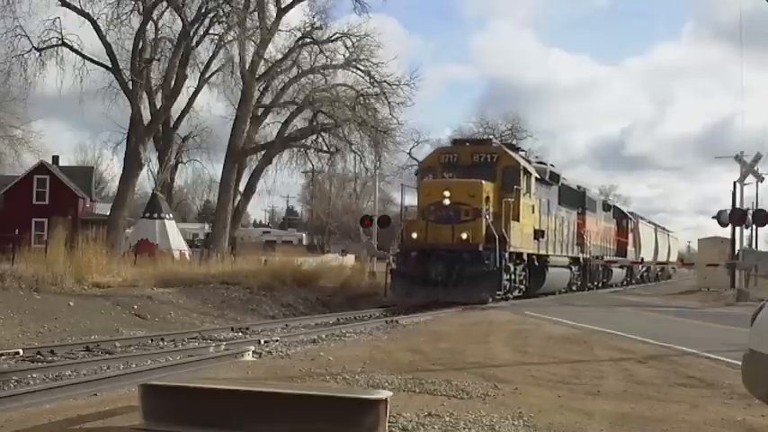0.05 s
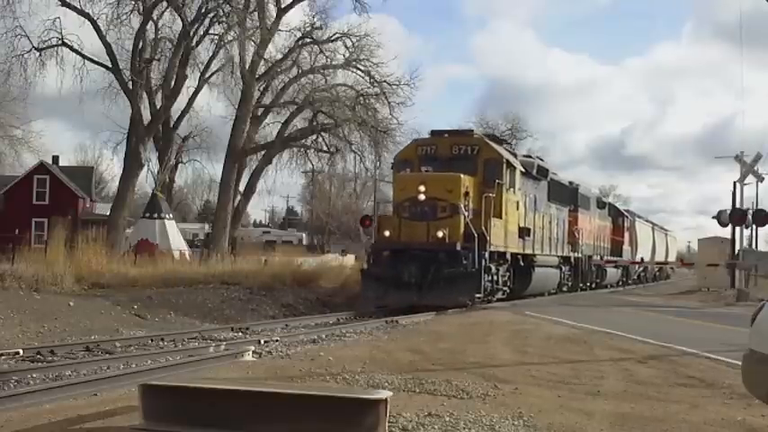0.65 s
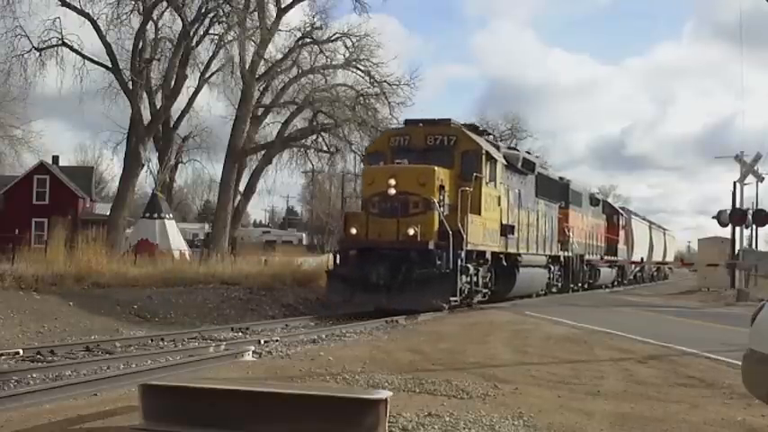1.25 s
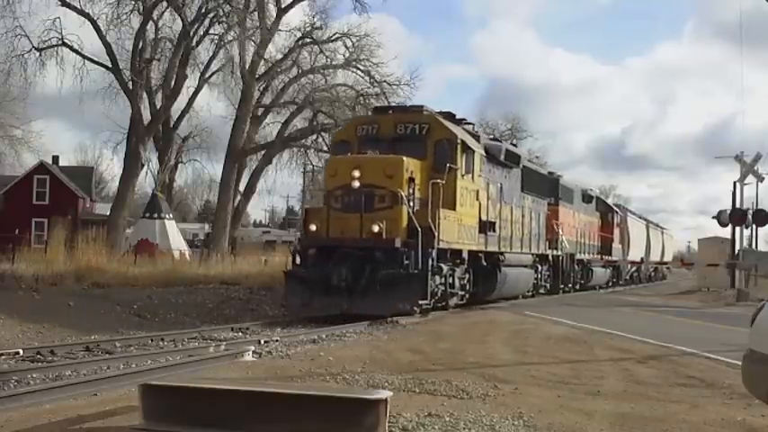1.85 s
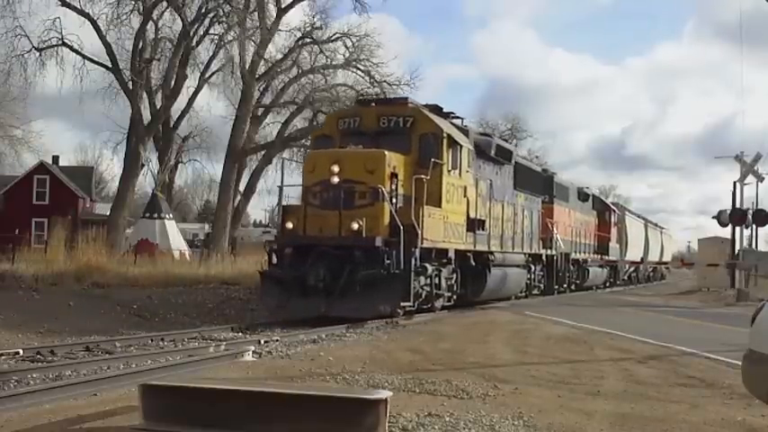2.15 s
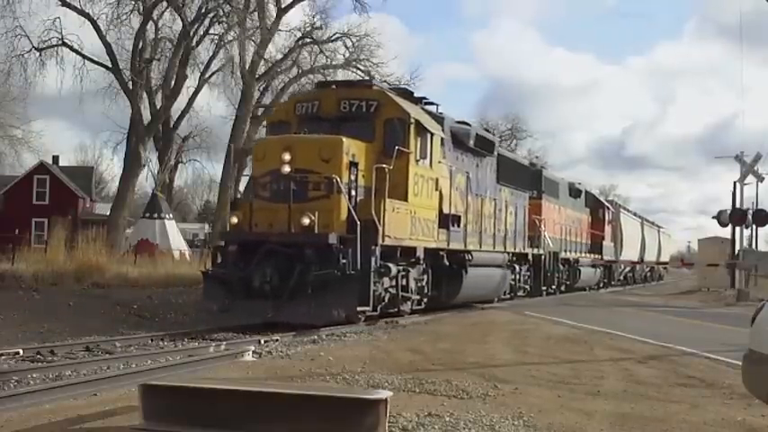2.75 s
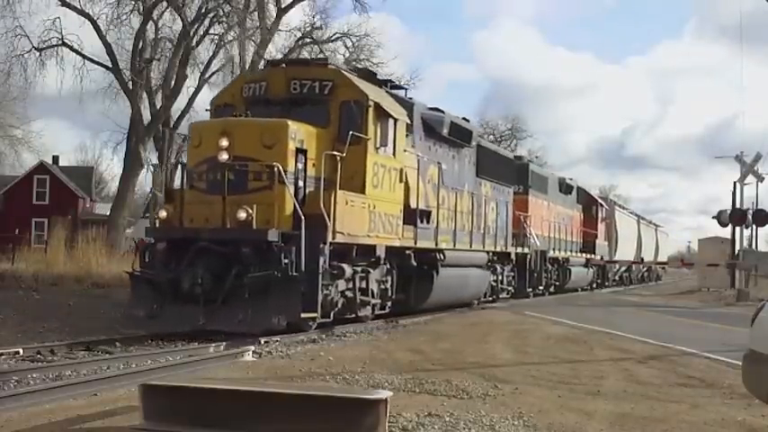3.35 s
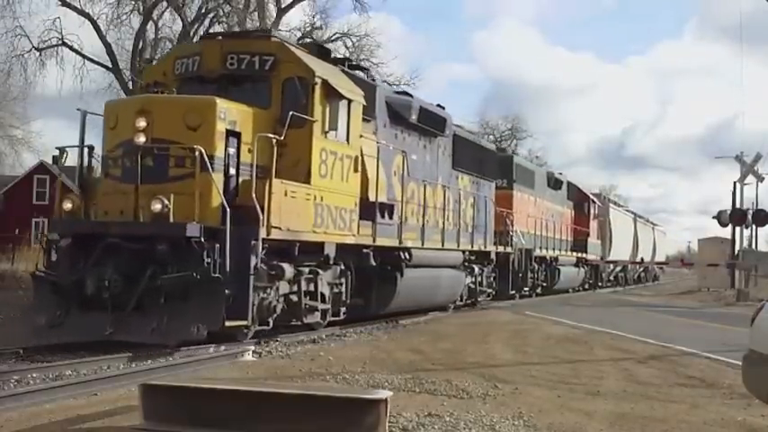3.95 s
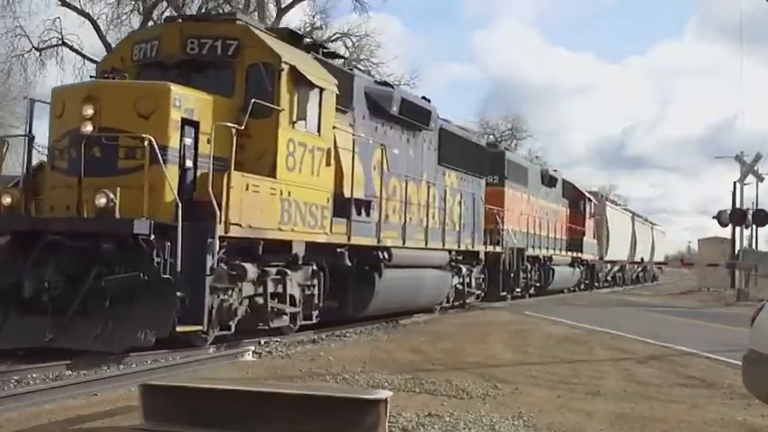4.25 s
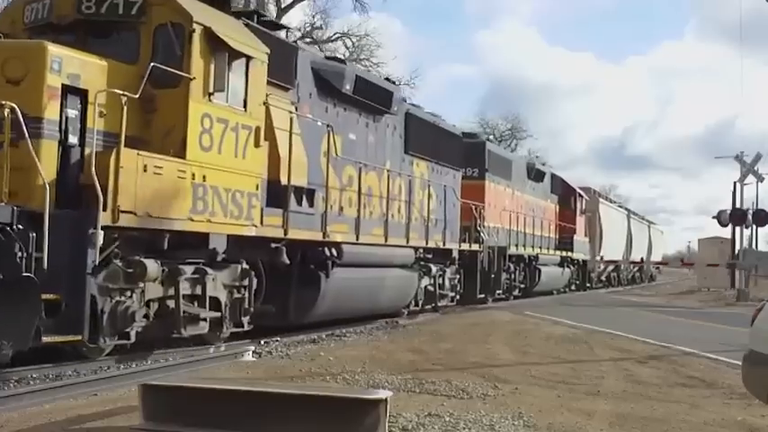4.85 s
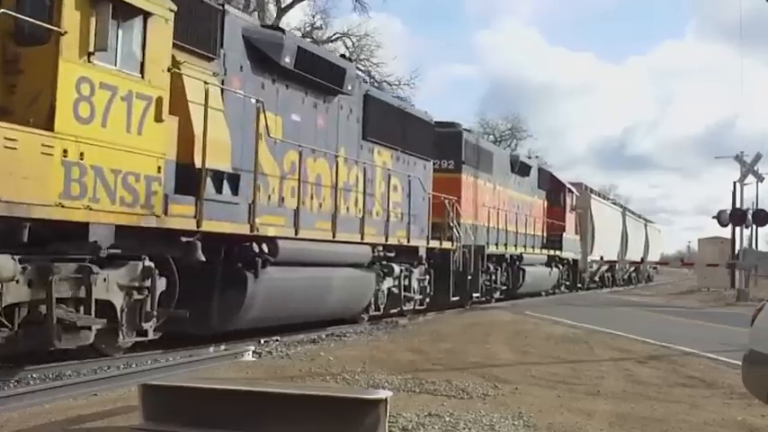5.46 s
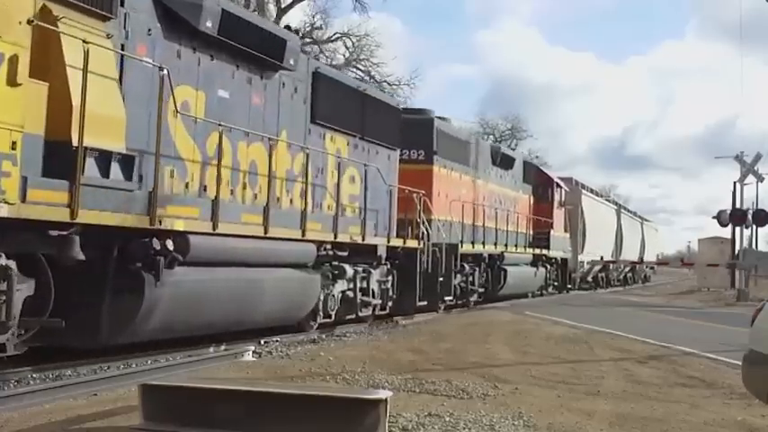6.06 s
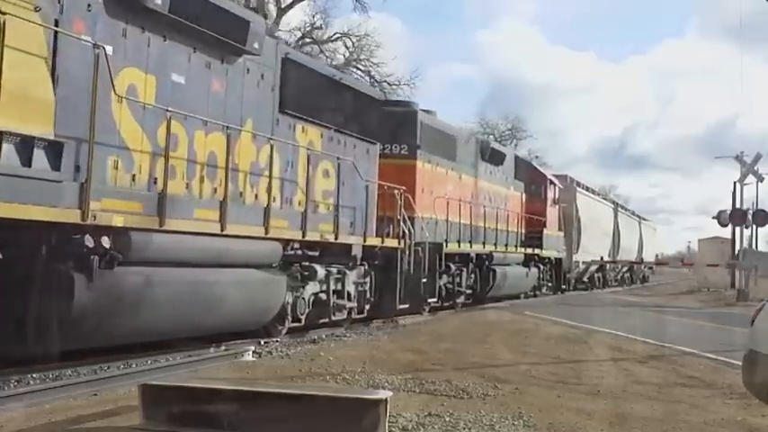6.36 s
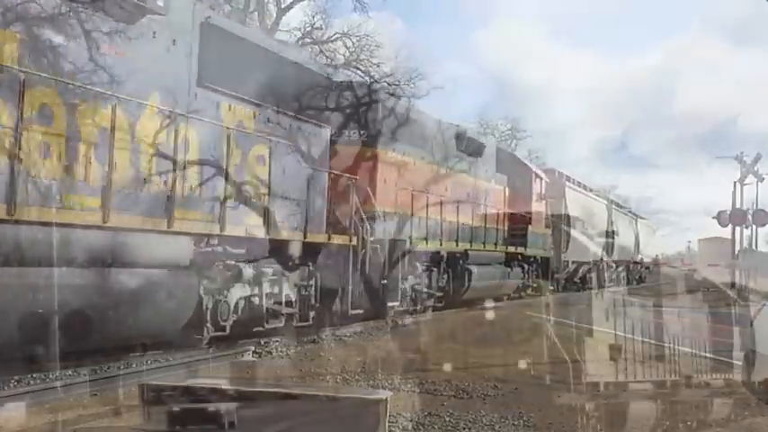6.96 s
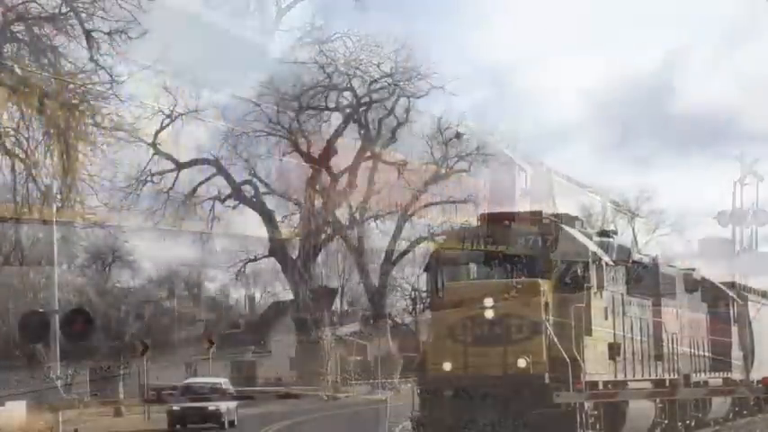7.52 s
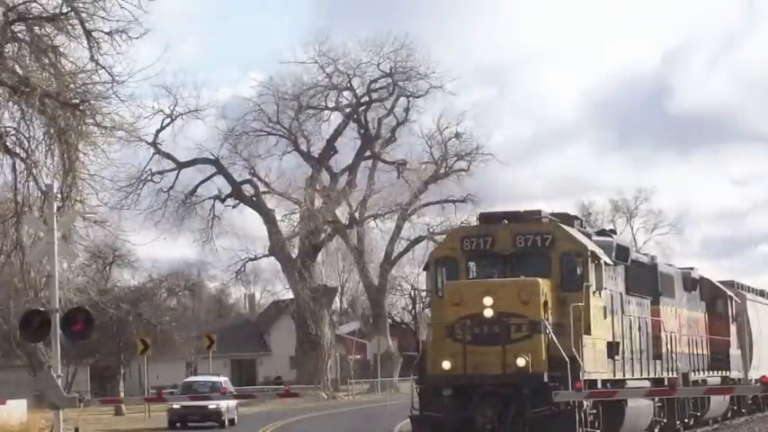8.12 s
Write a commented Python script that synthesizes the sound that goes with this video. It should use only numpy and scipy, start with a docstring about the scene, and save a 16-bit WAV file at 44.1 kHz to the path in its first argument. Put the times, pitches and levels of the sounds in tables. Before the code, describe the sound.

Outdoors beside the track, a train horn blares as a diesel locomotive nears, and its bell rings once. When the horn stops, the rolling rumble of wheels and the throbbing engine take over. The train draws level with the microphone, bringing uneven rail joint knocks, hollow thuds, bright metal clinks, hissing wheel scrapes and brief whines. The sound dies down at the end.

```python
"""A diesel freight locomotive bears down on a road crossing with its air horn held: a diaphragm chops the air
into a brassy chord, one chime on top. The bell strikes once, and the horn shuts off at about 1.5 s.
That bares the wheels, a gritty roar that surges as the out-of-round treads turn, over engine drone and
exhaust throb. As it draws level, rail joints knock, loose steel clinks, the frame thuds, flanges scrape
and whines swell past. Then it all fades."""
import sys
import numpy as np
from scipy import signal
from scipy.fft import rfft, irfft, next_fast_len
from scipy.io import wavfile

SR = 44100
rng = np.random.default_rng(int(sys.argv[2]) if len(sys.argv) > 2 else 0)


def master(y):
    """Save y as 16-bit WAV."""
    cut = np.clip(np.atleast_2d(y).T, -1, 1)
    pcm = np.round(cut * 32767)  # scale
    wavfile.write(sys.argv[1], SR, pcm.astype(np.int16))


N = 361179
T = np.arange(N) / SR

# The horn's main chime creeps sharp. Each row: time in seconds, pitch in Hz.
HORN_PITCH = [(0, 310.7), (.2, 311.3), (.52, 312.1), (1.0, 312.5), (1.3, 313.1), (1.6, 313.2)]
# The horn turns away. Each row: time in seconds, angle (0 head-on, 1 at a slant, 2 side-on).
HORN_ANGLE = [(0, 0), (.45, .1), (.7, .55), (.93, 1), (1.1, 1.15), (1.25, 1.9), (1.6, 2)]
# The main chime's timbre. Each row: harmonic number, then its level in dB head-on, at a slant, side-on.
MAIN_CHIME = [(1, -15, -14.5, -14.5), (2, -.5, 0, -1), (3, -1.5, -3, -8), (4, -1.5, -4, -11),
              (5, -2.5, -15.5, -13), (6, -13, -20.5, -30), (7, -16.5, -26, -24), (8, -20, -32, -30),
              (9, -28, -35, -36), (10, -32.5, -38, -28), (11, -39, -39, -28), (12, -42, -34, -38),
              (13, -47, -39.5, -42), (14, -45, -42.5, -53), (15, -50, -39, -49), (16, -41.5, -38.5, -53),
              (17, -47, -48, -42), (18, -50, -36, -45), (19, -47, -51, -47), (20, -51, -36, -41),
              (21, -58, -50, -53), (22, -55, -54, -46)]
# The horn's fundamental ducks briefly. Each row: centre in seconds, depth in dB, length in seconds.
FUNDAMENTAL_DIPS = [(.04, -4, .14), (.22, -10, .1), (.59, -8, .13), (.8, -6, .22), (1.025, -12, .09),
                    (1.355, -10, .08)]
# The rest of the chord, weaker chimes that fade soon after the horn opens. Each row: pitch ratio to the
# main chime, harmonic number, opening level in dB within the horn, fade in dB per second.
WEAK_CHIMES = [(1.214, 1, -33, 8), (1.214, 2, -10, 26), (1.214, 3, -20, 20), (1.211, 4, -22, 10),
               (1.643, 1, -12.5, 34), (1.643, 2, -28, 10), (1.643, 3, -23, 14), (1.807, 1, -31, 14),
               (1.807, 3, -27, 8)]
# EQ of the air rushing through the horn. Each row: frequency in Hz, relative gain in dB.
RASP_EQ = [(1000, -10), (2200, 0), (3000, -2), (4000, -5), (5000, 1), (6200, -3), (7200, -14)]

# Fader ride of the pass-by. Each row: time in seconds, wheel fader in dB, body rumble fader in dB.
PASS_BY = [(0, -31.5, -66), (.4, -41, -58), (1.15, -37, -50), (1.45, -32.5, -49), (1.6, -31, -39.5),
           (2.1, -33.5, -46.5), (2.7, -30, -43), (3.3, -32, -43), (3.7, -29, -40), (4.2, -30, -40.5),
           (4.7, -29, -40.5), (5.45, -27, -42), (6.1, -29, -41.5), (6.9, -30.5, -47), (7.3, -35, -49),
           (7.75, -37.5, -50.5), (8.19, -47, -58)]
# Distance, over which ground and air dull the wheels. Each row: time in seconds, 1 far to 0 near.
DISTANCE = [(0, 1), (1.1, 1), (1.55, 0)]
# The roar ducks briefly. Each row: centre in seconds, depth in dB, length in seconds.
ROAR_DIPS = [(1.635, -3.5, .08), (1.78, -6, .08), (4.69, -5.5, .11), (6.857, -6, .035), (6.985, -3, .06)]
# EQs of wheel roar, body rumble and flange hiss. Each row: frequency in Hz, relative gain in dB.
ROAR_EQ = [(250, -18), (380, -7.5), (520, -0.5), (760, 2), (930, -1.5), (1250, 1), (1600, -2), (2000, -7.5),
           (2600, -18), (3300, -24.5), (4200, -28), (6000, -55.5)]
RUMBLE_EQ = [(25, -21.5), (60, -17), (90, -7.5), (130, -2), (200, -1.5), (290, 2.5), (380, -1), (550, -9),
             (1000, -49)]
FLANGE_EQ = [(1900, -31.5), (2550, 17.5), (3000, 9.5), (3550, 1), (3900, 10), (4250, -2.5), (4800, 12.5),
             (5400, 5), (6100, 4), (6600, 2), (6900, 0), (7400, -20)]

# Engine and gear tones. Each row: pitch in Hz, width in Hz, pre-fader dB approaching, then alongside.
ENGINE_TONES = [(379, 10, -61, -60), (505, 22, -58, -51), (695, 110, -50, -53), (771, 24, -43.5, -47.5),
                (1036, 12, -55, -50), (1157, 10, -62, -53), (1555, 24, -51, -56), (1697, 14, -56, -50),
                (2530, 10, -62, -74), (2580, 10, -62, -74), (2686, 10, -62, -72), (3085, 70, -68, -65),
                (3360, 60, -73, -67.5)]
# The engine's ride. Each row: time in seconds, fader in dB, position (0 approaching, 1 alongside).
ENGINE_RIDE = [(0, -10.5, 0.062), (1, -6, 0.18), (1.6, 2.5, 0.6), (3.5, 5, 0.29), (4.8, 6, 1), (5.5, 6, 1),
               (6.3, 1.5, 1), (7, -1.5, 0.71), (7.6, -2, 1), (8.19, -12.5, 1)]
# The exhaust's ride. Each row: time in seconds, level in dB.
EXHAUST_RIDE = [(0, -67), (.7, -59.5), (1.3, -55.5), (1.65, -48.5), (3.2, -49.5), (4.2, -53.5),
                (6.2, -50.5), (7.3, -57.5), (7.8, -66), (8.19, -75)]
# EQ of the exhaust gas. Each row: frequency in Hz, relative gain in dB.
EXHAUST_EQ = [(20, -18.5), (36, -10), (50, -3), (64, -1.5), (85, -11), (140, -32.5), (400, -71)]

# Hits of loose steel. Each row: start in seconds, strength in dB, 60 dB decay time in seconds.
CLINKS = [(.108, -37.5, 0.014), (0.139, -44, .014), (2.43, -45, .1), (3.4, -44.5, 0.09),
          (3.888, -30, 0.076), (3.943, -33, 0.11), (4.121, -40, .08), (4.591, -30, 0.09), (4.627, -42, 0.2),
          (4.932, -41, .1), (4.992, -22.5, 0.1), (5.47, -39, .15), (5.631, -37, 0.11), (6.197, -45, .1),
          (6.584, -29, 0.054), (6.621, -34.5, 0.12), (7.165, -38, 0.055), (7.635, -35, 0.079)]
# Modes of the steel. Each row: pitch in Hz, relative level in dB, undamped decay time in seconds.
STEEL_MODES = [(2720, -3.5, 0.083), (3020, -7.5, .08), (3750, -6.5, 0.12), (4080, -6, .07),
               (4790, -3.5, 0.15), (5160, -5.5, .08), (5630, -4, 0.12), (6060, -1.5, 0.14),
               (6200, -7.5, .08), (6900, -10.5, .1)]
# EQ of a hit on metal. Each row: frequency in Hz, relative gain in dB.
CLINK_EQ = [(1200, -14.5), (2000, 6), (2700, 14.5), (3400, -6), (3900, 6.5), (4300, -4.5), (4900, 2),
            (5400, 3), (5950, 3.5), (6700, -1), (7400, -19)]
# The bell's partials. Each row: pitch in Hz, level in dB, decay time in seconds.
BELL_MODES = [(2088, -32, .62), (2328, -34, 1.15), (3838, -44, 1), (5250, -53, .4), (5680, -52, .35),
              (6040, -54, .25)]

# Wheels hit rail joints. Each row: start in seconds, level in dB, attack in seconds,
# decay time in seconds, send to the wheel's ring in dB.
KNOCKS = [(1.51, -30, 0.022, .07, -21), (1.569, -21.5, 0.011, 0.12, -22), (1.67, -32.5, 0.043, 0.25, -19),
          (1.835, -32, 0.04, 0.11, -21), (2.115, -31, 0.02, .11, -20), (2.27, -36.5, 0.017, 0.059, -16),
          (2.428, -28.5, 0.0083, 0.067, -11), (3.135, -26.5, 0.022, 0.05, -12), (3.21, -30, 0.015, .1, -16),
          (3.371, -29, 0.02, 0.21, -18.5), (3.655, -25.5, 0.012, 0.16, -15),
          (3.8675, -18.5, 0.0025, 0.05, 11), (3.877, -19.5, 0.006, 0.26, 3.5), (3.898, -25.5, .005, .1, 2),
          (3.932, -20, 0.018, 0.13, -9), (4.221, -26.5, 0.0062, 0.11, -15),
          (4.385, -24.5, 0.0085, 0.13, -10), (4.563, -24, 0.012, 0.035, -2),
          (4.588, -19.5, 0.0036, 0.036, -9), (4.618, -22.5, 0.02, 0.054, -14),
          (4.858, -25.5, 0.026, 0.13, -9), (4.922, -22, 0.016, 0.2, -4), (4.993, -18, 0.00069, 0.078, -17),
          (5.043, -27.5, 0.0048, 0.087, -17), (5.531, -27, 0.023, 0.23, -7),
          (5.618, -21, 0.02, 0.097, -8.5), (5.941, -23, 0.011, 0.24, -7),
          (6.189, -19.5, 0.0015, 0.077, -24), (6.51, -26.5, 0.016, 0.34, -9), (6.563, -25, 0.017, 0.049, 5),
          (6.582, -23.5, 0.003, 0.046, -19), (6.809, -31, 0.0082, 0.07, -1),
          (6.868, -21.5, 0.00045, 0.1, -4), (7.01, -31, 0.034, 0.75, -21)]
# Modes of a wheel. Each row: pitch in Hz, relative level in dB, decay time in seconds.
WHEEL_MODES = [(746, -3, 0.046), (990, -14.5, 0.04), (1232, -4.5, 0.12), (1490, -3.5, 0.081),
               (1770, -15, 0.06)]
# EQ of the joint clatter. Each row: frequency in Hz, relative gain in dB.
KNOCK_EQ = [(60, -34), (200, -6.5), (450, -1), (750, 2), (1000, 2.5), (1300, 3), (1600, 2), (2000, -7.5),
            (2800, -15.5), (4000, -26), (7000, -33.5)]
# Blows to the frame. Each row: start in seconds, strength in dB, frequency driven hardest in Hz.
THUDS = [(3.69, -24.5, 269), (3.947, -34, 240), (4.235, -28, 262), (4.4, -27.5, 300), (4.631, -23.5, 230),
         (4.642, -18.5, 305), (5.215, -25.5, 245), (5.634, -25.5, 287), (5.7, -28.5, 250),
         (5.945, -29.5, 287), (7.245, -30.5, 240), (7.29, -32, 215), (7.325, -32, 305)]
# Modes of the frame. Each row: pitch in Hz, relative level in dB, decay time in seconds.
FRAME_MODES = [(192, -13, .18), (219, -7.5, .28), (239.6, -7.5, .25), (262, -8, 0.3), (300, -4, 0.37),
               (327, -14.5, .17)]
# Flanges scrape the rail. Each row: peak in seconds, hiss in dB, rim sizzle in dB, length in seconds.
SCRAPES = [(3.978, -43.5, -54, 0.25), (4.197, -48, -63, 0.24), (4.965, -47, -50, 0.1),
           (5.003, -52, -38, .03), (5.05, -53, -48, .07), (5.493, -55, -53, 0.13), (5.67, -48, -66, 0.14),
           (5.98, -51, -66, 0.16), (6.242, -53, -60, 0.34), (6.46, -60, -54, .12), (6.633, -45, -57, 0.29),
           (6.934, -49, -61, 0.19), (7.074, -48, -47, 0.14), (7.165, -54, -50, 0.046),
           (7.212, -51, -58, 0.26), (7.64, -57, -54, 0.15), (7.9, -63.5, -67, 0.78)]
# Whines that swell past. Each row: peak in seconds, length in seconds, pitch in Hz, level in dB.
WHINES = [(5.145, 1.5, 157.2, -51.5), (5.3, .32, 1700, -35), (5.54, .14, 1696, -30), (6.4, .1, 1695, -38),
          (6.85, .6, 1695, -45), (6.0, .6, 1158, -39.5), (6.65, 1.2, 385, -50), (5.15, .44, 3330, -56),
          (5.54, .14, 3392, -56), (5.402, .99, 2860, -63), (7.75, .9, 1039, -55), (6.35, .5, 3380, -62),
          (6.75, .3, 3350, -59), (7.4, .3, 3370, -62), (7.77, .2, 3350, -64)]


def undb(db):
    """Decibels to gain."""
    return 10 ** (np.asarray(db) / 20)


def curve(table, column=1):
    """One column of a table, joined by straight lines in time."""
    rows = np.array(table, float)
    return np.interp(T, rows[:, 0], rows[:, column])


def unit(x):
    """Scale to rms 1."""
    return x / np.sqrt(np.mean(x ** 2))


def wobble(rate_hz):
    """Smooth random modulation, rms 1, that moves about rate_hz times a second."""
    size = next_fast_len(N)
    hz = np.arange(int(8 * rate_hz * size / SR)) * SR / size
    bins = rng.standard_normal((len(hz), 2)) @ [1, 1j]
    return unit(irfft(bins / (1 + (hz / rate_hz) ** 4), size)[:N])


def eq(x, points):
    """Minimum-phase EQ through (Hz, dB) points; white noise keeps its level."""
    size = 4096
    hz, db = np.transpose(points)
    bins = np.maximum(np.arange(size // 2 + 1) * SR / size, 1)
    gain = undb(np.interp(np.log(bins), np.log(hz), db))
    cepstrum = irfft(np.log(gain))
    cepstrum[1:size // 2] *= 2
    cepstrum[size // 2 + 1:] = 0
    response = irfft(np.exp(rfft(cepstrum)))
    return signal.fftconvolve(x, response / np.linalg.norm(response))[:N]


def attack(rise_s):
    """A two-second envelope that ramps up and holds."""
    return np.minimum(T[:2 * SR] / rise_s, 1)


def decay(t60):
    """A two-second envelope that falls 60 dB every t60 seconds."""
    return np.exp(-np.log(1000) * T[:2 * SR] / t60)


def swell(peak_s, length_s):
    """A smooth rise and fall around peak_s."""
    return np.cos(np.pi * np.clip((T - peak_s) / length_s, -.5, .5))


def ring(modes, detune=0):
    """Decaying modes of a struck body, each randomly detuned by a share of its pitch."""
    out = 0
    for hz, db, t60 in modes:
        hz *= 1 + detune * rng.standard_normal()
        out += undb(db) * decay(t60) * np.sin(2 * np.pi * hz * T[:2 * SR])
    return out


def add(track, start_s, sound):
    """Mix a sound in from start_s."""
    start = int(start_s * SR)
    track[start:start + len(sound)] += sound[:N - start]


def grit(per_s, spread_db):
    """Dense tiny impacts of unequal size, rms 1."""
    sizes = undb(spread_db * np.minimum(rng.exponential(size=N), 5))
    return unit((rng.random(N) < per_s / SR) * sizes * rng.choice([-1, 1], N))


def wavering_tone(hz, width_hz, waver=.6):
    """A slowly drifting sine in a narrow skirt of noise, rms 1."""
    phase = 2 * np.pi * (np.cumsum(hz * (1 + .002 * wobble(2))) / SR + rng.random())
    skirt = wobble(width_hz / 2) * np.cos(phase) + wobble(width_hz / 2) * np.sin(phase)
    return unit(np.cos(phase) + waver * skirt)


def horn(fader_db=-24.9, rasp_db=-47.5, ease_s=1.15, shut_s=1.54):
    """A diaphragm chops air into sharp pulses until the valve shuts; the middle harmonics beam forward."""
    pitch_hz = curve(HORN_PITCH) * (1 + .0005 * wobble(25) + .0003 * wobble(150))
    cycles = .5 + np.cumsum(pitch_hz) / SR
    angle = curve(HORN_ANGLE)
    chord = np.zeros(N)
    for harmonic, *beam_db in MAIN_CHIME:
        # moving air and shifting ground paths flutter each harmonic, more so off axis
        flutter_db = (.9 + .3 * angle) * min(harmonic / 4, 2.6) * wobble(10 + harmonic)
        if harmonic == 1:
            dips_db = sum(db * swell(s, length_s) for s, db, length_s in FUNDAMENTAL_DIPS)
            flutter_db += dips_db + 1.2 * wobble(7)
        phase_slip = min(harmonic / 10, 1.5) * wobble(2)
        gain = undb(np.interp(angle, [0, 1, 2], beam_db) + flutter_db)
        chord += gain * np.cos(2 * np.pi * harmonic * cycles + phase_slip)
    for ratio, harmonic, db, fade_db_per_s in WEAK_CHIMES:
        gain = undb(db - fade_db_per_s * T + 1.5 * wobble(12))
        chord += gain * np.cos(2 * np.pi * harmonic * ratio * cycles)
    puffs = (1 + np.cos(2 * np.pi * cycles)) * rng.standard_normal(N)  # air escapes with each pulse
    rasp = undb(rasp_db) * eq(puffs, RASP_EQ)
    # the level sags as the valve is eased, then drops away as it shuts
    valve_db = -4 * np.maximum(T - ease_s, 0) - 300 * np.maximum(T - shut_s, 0)
    return (np.sqrt(2) * chord + rasp) * undb(fader_db + valve_db + .6 * wobble(38))


def outdoor_echo(x, t60, wet_db):
    """A dull, diffuse tail thrown back by trees and houses."""
    tail = signal.sosfilt(signal.butter(1, 2500, fs=SR, output="sos"), rng.standard_normal(2 * SR))
    tail *= decay(t60) * attack(.0064)
    return undb(wet_db) * signal.fftconvolve(x, tail / np.linalg.norm(tail))[:N]


def tread_surge(start_hz=3.175, speedup_hz_per_s=.026):
    """Out-of-round treads pump the roar once and twice a turn as the wheels gather speed; in dB."""
    turns = .121 + start_hz * T + speedup_hz_per_s * T ** 2 / 2
    alongside = curve(ENGINE_RIDE, column=2)
    twice_db = np.interp(alongside, [0, 1], [3.6, 1.5]) * np.cos(4 * np.pi * turns)
    once_db = np.interp(alongside, [0, 1], [.8, 1.9]) * np.cos(2 * np.pi * (turns - .28))
    return (twice_db + once_db) * (1 - .5 * curve(DISTANCE))


def rolling(roar_trim_db=-2.5, hiss_trim_db=-23.5, far_hiss_db=-11, far_treble_db=-8):
    """Rough treads rattle wheels and rails; the body rumbles along and the flanges hiss and scrape."""
    far, wheel_db, body_db = curve(DISTANCE), curve(PASS_BY), curve(PASS_BY, column=2)
    dips_db = sum(db * swell(s, length_s) for s, db, length_s in ROAR_DIPS)
    surge_db = tread_surge() + 1.1 * wobble(30) + dips_db
    roar = eq(grit(per_s=3500, spread_db=1.5), ROAR_EQ) * undb(wheel_db + roar_trim_db + surge_db)
    rumble = eq(grit(per_s=1500, spread_db=3.5), RUMBLE_EQ) * undb(body_db + .46 * surge_db)
    hiss_gain = undb(wheel_db + hiss_trim_db + far_hiss_db * far + .31 * surge_db)
    scrape_gain = sum(undb(db) * swell(s, length_s) for s, db, _, length_s in SCRAPES)
    flange = eq(grit(per_s=7000, spread_db=-1), FLANGE_EQ)
    flange *= np.hypot(hiss_gain, scrape_gain) * undb(2.2 * wobble(22))
    wheels = roar + rumble + flange + rim_sizzle()
    treble = signal.sosfiltfilt(signal.butter(2, 2800, "high", fs=SR, output="sos"), wheels)
    return wheels + (undb(far_treble_db * far) - 1) * treble


def engine():
    """The diesel drones and its gears and blowers sing; the balance shifts as it draws level."""
    alongside = curve(ENGINE_RIDE, column=2)
    drone = np.zeros(N)
    for hz, width_hz, far_db, near_db in ENGINE_TONES:
        waver = max(width_hz / 22, .6)  # wide tones are more resonance than whistle
        drone += undb(far_db + (near_db - far_db) * alongside) * wavering_tone(hz, width_hz, waver)
    return drone * undb(curve(ENGINE_RIDE))


def exhaust(gas_db=-1):
    """The exhaust throbs: a deep, uneven tone in a bed of gas noise."""
    gas = unit(eq(rng.standard_normal(N), EXHAUST_EQ))
    throb = wavering_tone(hz=58, width_hz=14)
    return unit(throb + undb(gas_db) * gas) * undb(curve(EXHAUST_RIDE))


def steel_clinks(crash_db=-1.3, ring_db=-9):
    """Loose steel strikes with a bright crash of noise and rings on."""
    crashes, rings = np.zeros((2, N))
    for start_s, db, t60 in CLINKS:
        strike = undb(db) * attack(.002)
        add(crashes, start_s, strike * decay(t60) * rng.standard_normal(2 * SR))
        choke = min(t60 / .12, 1)  # a short clink damps the modes too
        modes = [(hz, mode_db + 2 * rng.standard_normal(), mode_t60 * choke)
                 for hz, mode_db, mode_t60 in STEEL_MODES]
        add(rings, start_s, strike * ring(modes, detune=.0053))
    return undb(crash_db) * eq(crashes, CLINK_EQ) + undb(ring_db) * rings


def bell(start_s=.645, beat_hz=3.5, twin_db=-9, clapper_db=-54):
    """The clapper clanks once on the bell, whose partials ring in close, beating pairs."""
    out = np.zeros(N)
    twins = ring([(hz + beat_hz, db + twin_db, t60) for hz, db, t60 in BELL_MODES])
    clank = eq(rng.standard_normal(2 * SR) * decay(.12), CLINK_EQ)[:2 * SR]
    add(out, start_s, (ring(BELL_MODES) - twins + undb(clapper_db) * clank) * attack(.006))
    return out


def joint_knocks(ring_trim_db=-3):
    """Clatter builds as a wheel rides over a rail gap, then dies away while the wheel rings briefly."""
    clatter, rings = np.zeros((2, N))
    for start_s, db, rise_s, t60, send_db in KNOCKS:
        envelope = np.concatenate([np.linspace(0, 1, int(rise_s * SR)), decay(t60)])[:2 * SR]
        add(clatter, start_s, undb(db) * envelope * rng.standard_normal(2 * SR))
        add(rings, start_s + rise_s, undb(db + send_db + ring_trim_db) * ring(WHEEL_MODES, detune=.031))
    return eq(clatter, KNOCK_EQ) + rings


def frame_thuds(spread_hz=42):
    """The frame gives hollow thuds; each blow mostly wakes the modes near its own centre frequency."""
    out = np.zeros(N)
    for start_s, db, centre_hz in THUDS:
        modes = [(hz, mode_db - min(10 * ((hz - centre_hz) / spread_hz) ** 2, 20), t60)
                 for hz, mode_db, t60 in FRAME_MODES]
        add(out, start_s, undb(db) * ring(modes, detune=.0099) * attack(.0041))
    return out


def rim_sizzle(centre_hz=5850, width_hz=860):
    """A scraping flange drives the wheel's rim unevenly, so it sizzles in one high band."""
    phase = 2 * np.pi * np.cumsum(centre_hz * (1 + .006 * wobble(12))) / SR
    band = wobble(width_hz / 2) * np.cos(phase) + wobble(width_hz / 2) * np.sin(phase)
    envelope = sum(undb(db) * swell(s, length_s) for s, _, db, length_s in SCRAPES)
    return unit(band * undb(3.2 * wobble(45))) * envelope


def passing_whines():
    """Whines swell and sink as parts of the locomotive draw level."""
    return sum(undb(db) * swell(peak_s, length_s) * wavering_tone(hz, width_hz=26, waver=.3)
               for peak_s, length_s, hz, db in WHINES)


def scene():
    """The mono mix: horn and hits with a faint outdoor echo, over a dry bed of wheels and engine."""
    foreground = horn() + steel_clinks() + bell() + joint_knocks() + frame_thuds()
    echo = outdoor_echo(foreground, t60=.7, wet_db=-26)
    bed = rolling() + engine() + exhaust() + passing_whines()
    return (foreground + echo + bed)[None]


def record(dry):
    """A steep high cut at 7.3 kHz takes the top off the mix."""
    return signal.sosfilt(signal.ellip(10, .2, 70, 7300, fs=SR, output="sos"), dry)


dry = scene()
out = record(dry)
master(out)
```